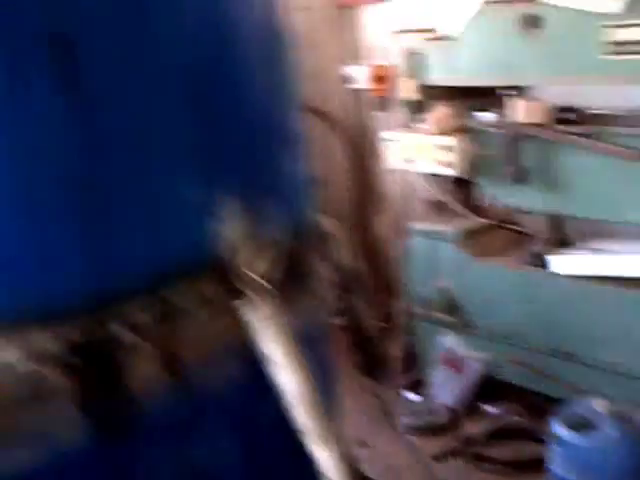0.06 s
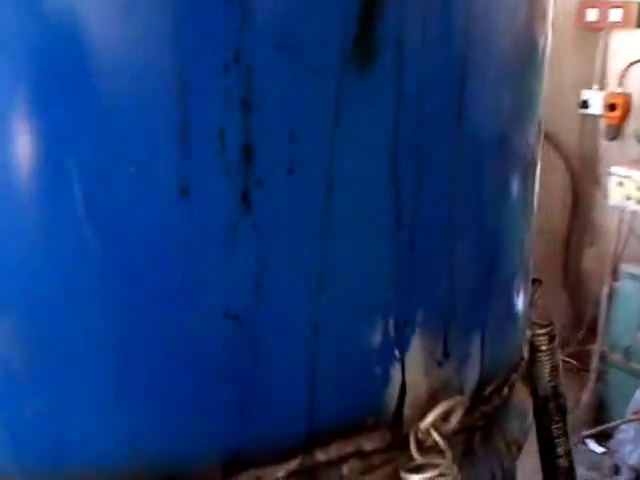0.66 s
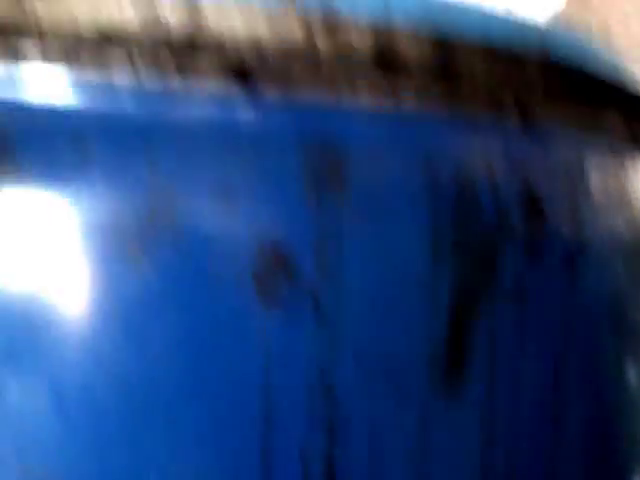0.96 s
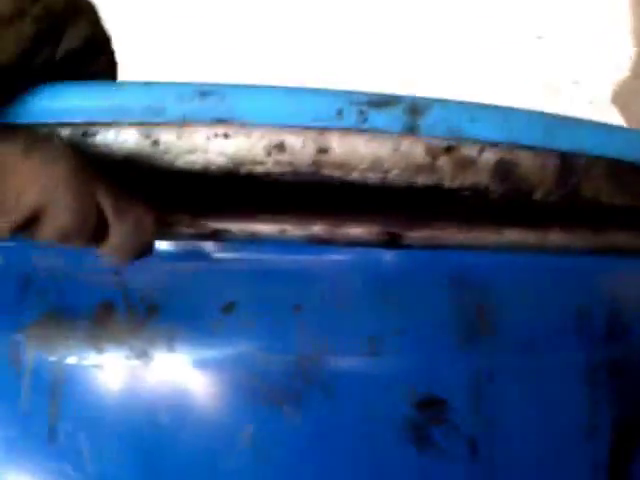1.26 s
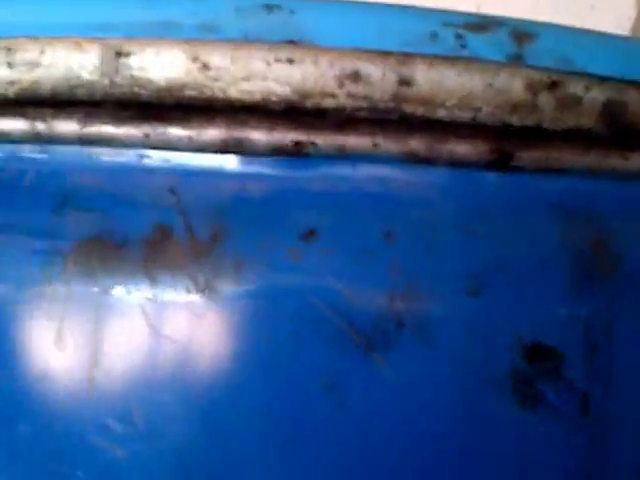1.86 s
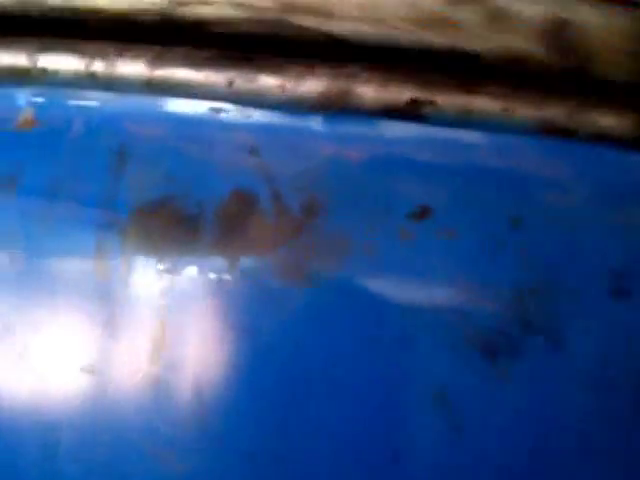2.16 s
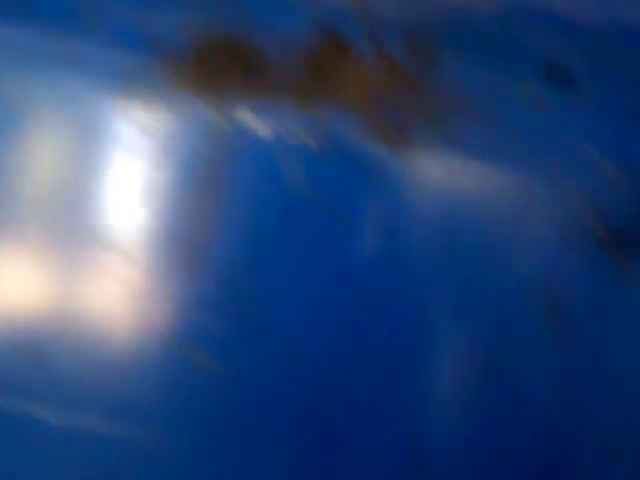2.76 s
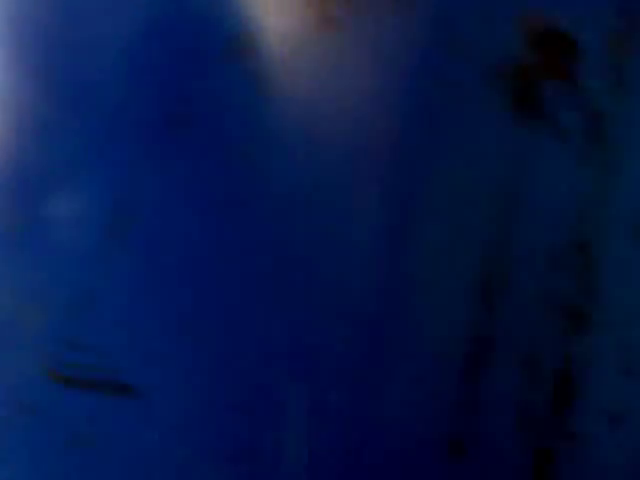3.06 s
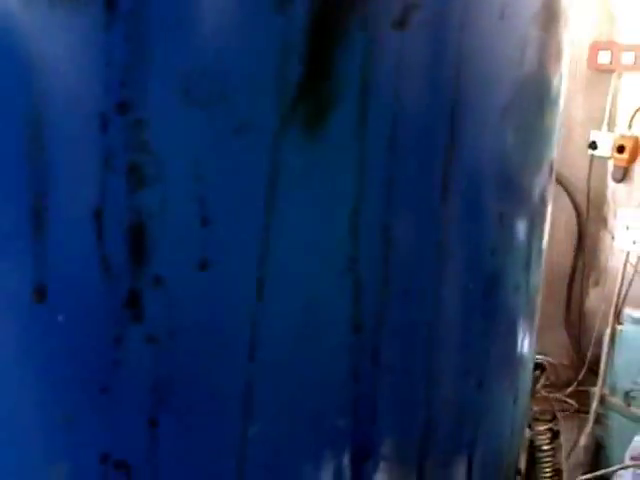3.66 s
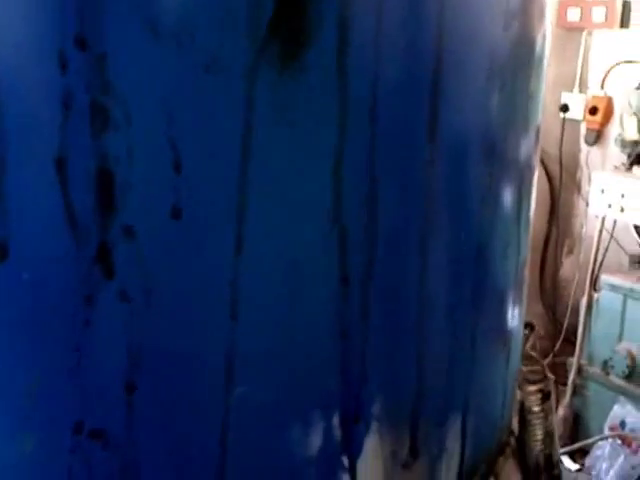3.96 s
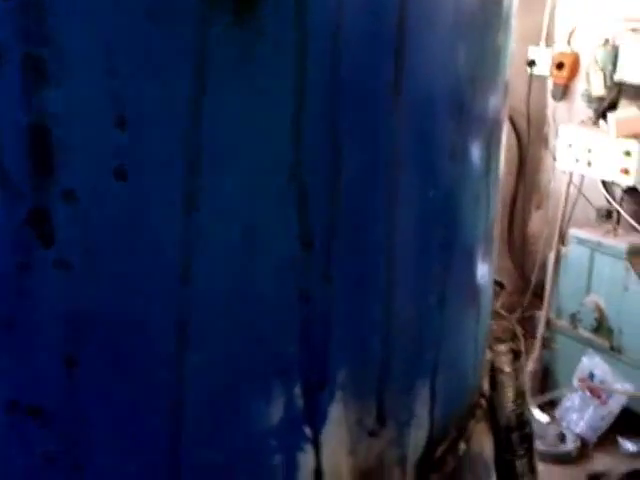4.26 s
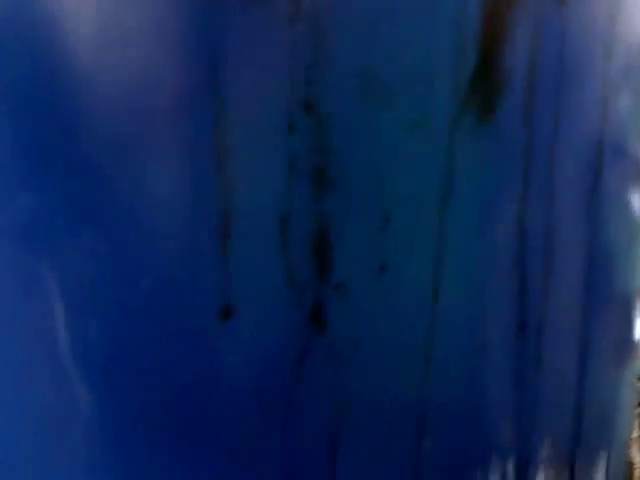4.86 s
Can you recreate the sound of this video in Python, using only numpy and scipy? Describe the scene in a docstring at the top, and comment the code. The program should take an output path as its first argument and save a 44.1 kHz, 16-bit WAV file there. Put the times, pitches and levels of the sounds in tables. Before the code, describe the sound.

Close, gritty scrapes and ringing clanks come in uneven bursts as a lid is pushed and twisted onto a hollow steel barrel.

```python
"""At the rim of a steel drum, close to a small microphone: a metal lid is pushed and twisted on.
Stick-slip makes the rim grate, judder and hiss in strokes; now and then the edge squeaks.
The lid clanks as it slips and seats, and the drum wall thumps as it gives and springs back.
Every contact rings the hollow shell, over faint background noise. The hardest knocks overload
the narrow-band recorder."""
import sys
import numpy as np
from scipy import signal
from scipy.io import wavfile
from scipy.ndimage import uniform_filter1d, minimum_filter1d

SR = 44100
rng = np.random.default_rng(int(sys.argv[2]) if len(sys.argv) > 2 else 0)


def store_wav(level_fs):
    """Save 16-bit WAV to argv[1]."""
    pcm = np.round(np.clip(np.atleast_2d(level_fs), -1, 1) * 32767)
    wavfile.write(sys.argv[1], SR, pcm.T.astype(np.int16))


N = 226002

# decay of the shell and its surroundings: (frequency [Hz], t60 [s])
RING_T60 = [(120, 0.31), (350, 0.73), (800, 0.71), (2200, 0.44), (3500, 0.36), (6000, 0.32)]


def amp(db):
    """Decibels to gain."""
    return 10 ** (np.asarray(db) / 20)


def unit(x):
    """Scale to rms 1."""
    return x / np.sqrt(np.mean(x ** 2) + 1e-20)


def read(points, hz):
    """Interpolate a table over log frequency."""
    table_hz, value = np.transpose(points)
    return np.interp(np.log(hz + 1), np.log(table_hz + 1), value)


def add(mix, start_s, sound):
    """Mix a sound in at start_s."""
    part = mix[max(round(start_s * SR), 0):][:len(sound)]
    part += sound[:len(part)]


def through(x, response):
    """Convolve, keeping the length."""
    return signal.fftconvolve(x, response)[:len(x)]


def band(x, hz, kind, order=3):
    """Butterworth filter."""
    return signal.sosfilt(signal.butter(order, hz, kind, fs=SR, output="sos"), x)


def colour(spectrum, size=4096):
    """Minimum-phase response of energy 1 with the given spectral shape."""
    log_gain = np.log(amp(read(spectrum, abs(np.fft.fftfreq(size, 1 / SR)))))
    response = np.fft.ifft(np.exp(np.conj(signal.hilbert(log_gain)))).real[:size // 2]
    return response / np.linalg.norm(response)


def background(rms_db=-53.5):
    """Faint steady noise, mostly low."""
    # noise spectrum: (frequency [Hz], relative density [dB])
    spectrum = [(12, -43.5), (20, -15.5), (49, -13.5), (124, -2.5), (188, -18.5), (259, -10), (583, -14),
                (954, -16.5), (3430, -23), (5480, -29.5), (7180, -36), (9330, -73), (15800, -120)]
    return amp(rms_db) * unit(through(rng.standard_normal(N), colour(spectrum)))


def drum_modes(t60_scale=0.95, gain_db=-18.0, cavity_hz=63, cavity_db=-10.0, cavity_t60_s=1.5):
    """Response of the drum's clearest modes; the air inside booms faintly."""
    # shell modes: (frequency [Hz], relative level [dB])
    modes = [(144, -3), (264, 5.5), (372, 4), (455, 1.5), (537, 4), (631, 6.5), (689, 1.5), (769, -20.5),
             (807, 4), (837, 6.5), (922, 6), (959, -2), (1228, 4.5), (1388, -4.5), (1484, -17.5),
             (1577, -15.5), (1841, -11), (1982, -9.5), (2059, -16.5), (2230, -19), (2330, 3), (2455, 1.5),
             (2723, 8.5), (3105, -13)]
    t = np.arange(SR) / SR
    ring = amp(cavity_db - 60 * t / cavity_t60_s) * np.sin(2 * np.pi * cavity_hz * t)
    for hz, db in modes:
        t60_s = t60_scale * read(RING_T60, hz)
        ring += amp(db - 60 * t / t60_s) * np.sin(2 * np.pi * (hz * t + rng.random()))
    return amp(gain_db) * ring / np.linalg.norm(ring)


def shell(early_db=0.5, early_s=0.0067, rise_s=0.00028):
    """Response of dense modes and reflections: strong at first, each band dying at its own rate."""
    hz, t, noise = signal.stft(rng.standard_normal(SR), SR, nperseg=256)
    decay = amp(-60 * t / read(RING_T60, hz)[:, None])
    tail = signal.istft(noise * decay, SR, nperseg=256)[1]
    t = np.arange(len(tail)) / SR
    tail = tail * (1 + amp(early_db) * np.exp(-t / early_s)) * (1 - np.exp(-t / rise_s))
    return tail / np.linalg.norm(tail)


def travelling_ring(force, moves_per_s=24.0, spots=6):
    """The contact travels round the rim, ringing different shell modes at each spot."""
    place = np.arange(N) / SR * moves_per_s
    out = np.zeros(N)
    for spot in range(spots):
        distance = abs((place - spot + spots / 2) % spots - spots / 2)
        share = np.cos(np.pi / 2 * np.minimum(distance, 1))
        out += through(force * share, shell())
    return out


def squeaks(glide=0.015, waver=0.05, waver_hz=500):
    """The edge sticks and slips fast enough to sing, unsteadily and rising a little."""
    # edge squeaks: (time [s], level [dB], pitch [Hz], length [s])
    events = [(0.444, -30.5, 1730, 0.051), (2.113, -16.5, 2856, 0.057), (2.487, -22.5, 3710, 0.014),
              (3.087, -25.5, 6200, 0.0037), (3.103, -31, 6100, 0.0024), (3.108, -15.5, 5900, 0.0025),
              (3.527, -5.5, 2595, 0.014), (3.611, -22.5, 3075, 0.027)]
    out = np.zeros(N)
    wander = unit(band(rng.standard_normal(N), waver_hz, "low"))
    for start_s, db, hz, length_s in events:
        ramp = np.linspace(-1, 1, round(length_s * SR))
        pitch_hz = hz * (1 + glide * ramp + waver * wander[round(start_s * SR):][:len(ramp)])
        tone = np.sin(2 * np.pi * np.cumsum(pitch_hz) / SR)
        add(out, start_s, amp(db) * tone * np.hanning(len(ramp)))
    return out


def thumps(swell_s=0.014, fade_s=0.022, gain_db=-4.0):
    """The wall gives and springs back at one low pitch, damped by the hands pressing on it."""
    # wall swings: (time [s], relative level [dB], pitch [Hz])
    swings = [(0.555, -3.5, 174), (0.992, -12.5, 264), (1.056, -14, 130.6), (1.444, -7, 257.6),
              (1.554, -16, 260), (2.237, 0.5, 377.5), (2.342, -3.5, 137.5), (2.484, 0.5, 359.5),
              (2.62, -1, 435), (2.679, -1, 323), (3.072, -8, 187), (3.367, -2, 247), (3.507, 0.5, 305),
              (4.244, -5.5, 235.6), (4.28, 0.5, 377.3)]
    out, t = np.zeros(N), np.arange(SR // 3) / SR
    envelope = (1 - np.exp(-t / swell_s)) * np.exp(-t / fade_s)
    for start_s, db, hz in swings:
        add(out, start_s, amp(db + gain_db) * np.sin(2 * np.pi * hz * t) * envelope)
    return out


def slips(per_s, spread_db, clump_db, clump_hz):
    """Tiny stick-slip releases of uneven size, in clumps."""
    clumps = unit(band(rng.standard_normal(N), clump_hz, "low"))
    size_db = spread_db * np.minimum(rng.exponential(1, N), 4) + clump_db * np.clip(clumps, -2, 2)
    return unit(amp(size_db) * rng.choice([-1, 1], N) * (rng.random(N) < per_s / SR))


def scrape(grate_db=4.5, judder_db=-1.0, hiss_db=18.0, split_hz=1150, hiss_hz=4300, grip_s=0.0042):
    """Stroke force: grit grates the edge, coarser slips shake the lid, fine rust hisses."""
    # pushes along the rim: (time [s], rise [s], stop [s], grate [dB], judder [dB], hiss [dB])
    strokes = [(0.45, 0.032, 0.032, -27, -36.5, -31), (0.548, 0.059, 0.059, -10, -10, -40),
               (0.653, 0.012, 0.11, -14, -13, -26), (0.759, 0.0076, 0.065, -27, -21, -39),
               (0.858, 0.036, 0.14, -30.5, -36, -32), (1.316, 0.053, 0.083, -25, -20.5, -33.5),
               (1.429, 0.038, 0.15, -27, -21.5, -46), (1.534, 0.024, 0.089, -21.5, -18, -39),
               (1.655, 0.023, 0.082, -24, -23.5, -31.5), (1.823, 0.0072, 0.077, -32.5, -25, -43),
               (1.899, 0.085, 0.11, -29.5, -43.5, -34), (2.088, 0.032, 0.1, -14, -19, -22.5),
               (2.229, .02, 0.024, -36, -7.5, -53), (2.281, 0.017, 0.25, -17, -15, -31.5),
               (2.478, 0.057, 0.038, -11.5, -12.5, -23), (2.61, 0.013, 0.077, -15, -11.5, -23.5),
               (2.668, 0.014, .12, -20.5, -14.5, -33), (2.788, 0.012, 0.092, -19, -23.5, -34),
               (3.058, 0.049, 0.034, -29, -21.5, -31.5), (3.2, 0.05, 0.07, -39, -44, -43),
               (3.278, 0.061, 0.058, -25, -25, -32), (3.358, 0.021, 0.079, -8, -14.5, -29.5),
               (3.48, 0.056, 0.21, -15, -14.5, -48.5), (3.68, 0.01, 0.11, -24.5, -17, -49),
               (3.839, 0.049, .12, -28.5, -27, -37.5), (4.058, 0.033, 0.13, -26.5, -24.5, -39),
               (4.226, 0.011, 0.089, -31, -9, -33), (4.511, 0.0086, 0.065, -21, -18.5, -29.5),
               (4.655, 0.031, 0.079, -25, -29.5, -31), (4.781, 0.042, 0.067, -35, -34, -53),
               (5.099, 0.01, .02, -25, -26.5, -34)]
    grate = band(slips(per_s=2200, spread_db=-2.0, clump_db=4.0, clump_hz=91), [split_hz, hiss_hz], "band")
    judder = band(slips(per_s=600, spread_db=2.5, clump_db=3.0, clump_hz=70), split_hz, "low")
    hiss = band(slips(per_s=7000, spread_db=2.5, clump_db=4.0, clump_hz=150), hiss_hz, "high")
    layers = [(grate, grate_db, 1.48), (judder, judder_db, 1), (hiss, hiss_db, 1.94)]
    force = np.zeros(N)
    for start_s, rise_s, stop_s, *levels_db in strokes:
        span = np.arange(round(start_s * SR), min(round((start_s + rise_s + stop_s) * SR), N))
        t = span / SR - start_s
        speed_db = np.interp(t, [0, rise_s, rise_s + stop_s], [-8.0, 0, -12])  # catch, peak, slow down
        grip = np.clip(np.minimum(t, t[-1] - t) / grip_s, 0, 1)
        for (layer, gain_db, speed_exponent), db in zip(layers, levels_db):
            add(force, start_s, layer[span] * amp(db + gain_db + speed_exponent * speed_db) * grip)
    return force


def panel_flex(hz, flex_s=0.0017, gain_db=0.5, overtone_ratio=1.9, overtone_db=-13.5):
    """The struck panel swings for a few cycles in two bending modes."""
    t = np.arange(SR // 8) / SR
    first = np.sin(2 * np.pi * hz * t) * t / flex_s * np.exp(1 - t / flex_s)
    second = np.sin(2 * np.pi * overtone_ratio * hz * t) * np.exp(-t / (2 * flex_s))
    return -amp(gain_db) * (first + amp(overtone_db) * second)


def edge_crack(gain_db=1.5, spread_s=0.003935, first_hz=5400, last_hz=1200):
    """The edges hit; sheet steel carries treble faster than bass, so the crack sweeps down."""
    progress = np.arange(0, spread_s, 1 / SR) / spread_s
    hz = first_hz * (last_hz / first_hz) ** progress
    return amp(gain_db) * np.sin(2 * np.pi * np.cumsum(hz) / SR) * np.sin(np.pi * np.sqrt(progress))


def edge_rattle(per_s=4000, fade_s=0.012, low_cut_hz=320):
    """The edges bounce in a dying burst of clicks."""
    t = np.arange(SR // 8) / SR
    bounces = unit(rng.choice([-1, 1], len(t)) * (rng.random(len(t)) < per_s / SR))
    return band(bounces * np.exp(-t / fade_s), low_cut_hz, "high", order=2)


def clanks():
    """The lid strikes the rim: held tight it knocks drily, free it lets the shell boom."""
    # blows: (time [s], knock [dB], pitch [Hz], rattle [dB], crack re rattle [dB], boom re knock [dB])
    blows = [(0.454, -41, 500, -36, -2, -13), (0.548, -14, 383, -10.5, -14.5, -9.5),
             (0.572, -8.5, 454, -9.5, -12.5, -5), (0.595, -12, 366, -13.5, -8, -4),
             (0.636, -14, 470, -19.5, -7, 1), (0.664, -18, 486, -12, -3, -7),
             (0.774, -26, 450, -15, -14, -20), (1.049, 7, 720, -7, 1, -27.5),
             (1.444, -20, 900, -35, -15, -4), (1.545, -16.5, 584, -19.5, -4.5, -14),
             (1.773, -34, 477, -41, 13.5, -13), (1.83, -18.5, 290, -25.5, -10, 3.5),
             (1.975, -36, 780, -29, 1, -10.5), (2.103, -21, 455, -32.5, 13, -10),
             (2.168, -9, 557, -6.5, -14, -13.5), (2.237, -1, 446, -6, 3.5, -11),
             (2.29, -25, 479, -13.5, -13, -4), (2.344, -6, 592, -10, -13, -6),
             (2.484, -9, 377, -20.5, -3, 2.5), (2.505, -15, 460, -19.5, 3.5, -19),
             (2.617, -3.5, 454, -14, -8, -19), (2.626, -5, 450, -31, 0.5, -22),
             (2.684, -2, 553, -14.5, -12, -14), (2.764, -24, 565, -16.5, -11, -13),
             (3.066, -8, 572, -26.5, -40, -2.5), (3.363, -16, 740, -10.5, -8, -11.5),
             (3.378, -4.5, 527, -12, -14, -10.5), (3.39, 3.5, 820, -1, -6, -9.5),
             (3.479, -6.5, 505, -6.5, -20, -6), (3.504, -18, 387, -3, -6, -14),
             (3.531, 4.5, 472, -7, 2, -19), (3.567, -6, 524, -17, -12, -11.5),
             (3.597, -13, 385, -14, -1, -14.5), (3.688, -13.5, 523, -13.5, -5.5, -3),
             (4.078, -42, 870, -24.5, -9.5, -11), (4.229, -13, 304, -19, -17.5, -1),
             (4.239, 3.5, 574, -4, 0, -3), (4.264, -6, 826, -14, -1.5, 0.5), (4.627, 2, 840, -11.5, 8, -18),
             (4.631, 4, 733, -11, -36, -13)]
    knocks, cracks, rattles, booms = np.zeros((4, N))
    for start_s, knock_db, hz, rattle_db, crack_db, boom_db in blows:
        flex = panel_flex(hz)
        add(knocks, start_s, amp(knock_db) * flex)
        add(cracks, start_s, amp(rattle_db + crack_db) * edge_crack())
        add(rattles, start_s, amp(rattle_db) * edge_rattle())
        add(booms, start_s, amp(knock_db + boom_db) * flex)
    return knocks, cracks, rattles, booms


def scene(scrape_direct_db=-5.0, shell_db=-6.0,
          squeak_ring_db=-12.5, rattle_ring_db=3.0, crack_ring_db=-2.5, thump_ring_db=-19.5):
    """Contact forces sound directly through the steel and ring the drum."""
    # sheet steel response: (frequency [Hz], relative gain [dB])
    steel_spectrum = [(24, -63.5), (40, -22), (91, -25), (135, -2), (265, -1), (301, -6), (375, -1.5),
                      (734, -5.5), (818, -9.5), (1020, -10), (2760, -16), (5910, -35.5), (7180, -47.5),
                      (9330, -61.5), (15800, -120)]
    steel = colour(steel_spectrum)
    rubbing = scrape()
    knocks, cracks, rattles, booms = clanks()
    chirps, wall = squeaks(), thumps()
    direct = through(amp(scrape_direct_db) * rubbing + cracks + rattles, steel) + knocks + wall + chirps
    drive = through(rubbing + amp(crack_ring_db) * cracks + amp(rattle_ring_db) * rattles, steel)
    drive += booms + amp(squeak_ring_db) * chirps + amp(thump_ring_db) * wall
    ring = amp(shell_db) * travelling_ring(drive) + through(drive, drum_modes())
    return (direct + ring + background())[None]


def limiter(x, ceiling_db=-1.15, recover_db_per_s=700, late_share=0.85):
    """Turn peaks down within 1 ms; acting partly late, it lets the hardest overshoot."""
    fall_db = np.arange(N) * recover_db_per_s / SR
    peak_db = np.maximum.accumulate(20 * np.log10(abs(x) + 1e-9) + fall_db) - fall_db
    over_db = np.maximum(peak_db - ceiling_db, 0)
    ahead_db = -minimum_filter1d(-over_db, size=44)
    cut_db = uniform_filter1d(late_share * over_db + (1 - late_share) * ahead_db, size=44)
    return x / amp(cut_db)


def record(dry, pass_hz=7300, converter_hz=16000, image_db=-23.0, image_top_hz=10000, top_hz=16000):
    """Narrow-band recorder: the converter mirrors a trace of treble; peaks are limited and clip."""
    narrow = signal.fftconvolve(dry[0], signal.firwin(71, pass_hz, fs=SR), "same")
    mirrored = narrow * np.cos(2 * np.pi * converter_hz * np.arange(N) / SR)
    image = band(mirrored, image_top_hz, "low", order=16)
    clipped = np.clip(limiter(narrow + amp(image_db) * image), -1, 1)
    low_pass = signal.firwin(255, top_hz, window=("kaiser", 9), fs=SR)
    return signal.fftconvolve(clipped, low_pass, "same")[None]


dry = scene()
out = record(dry)
store_wav(out)
```